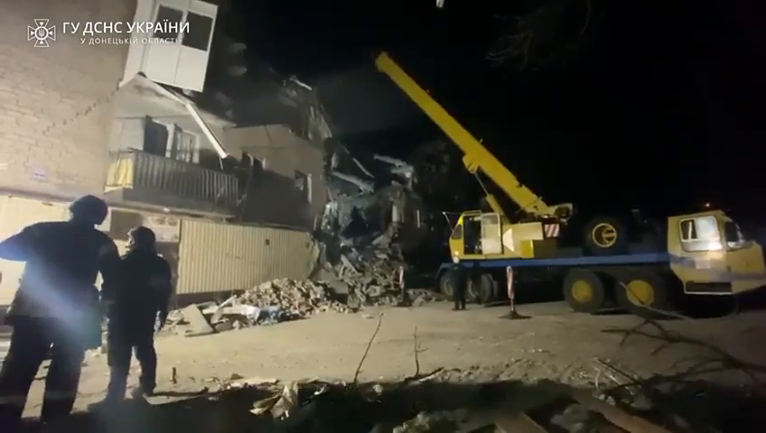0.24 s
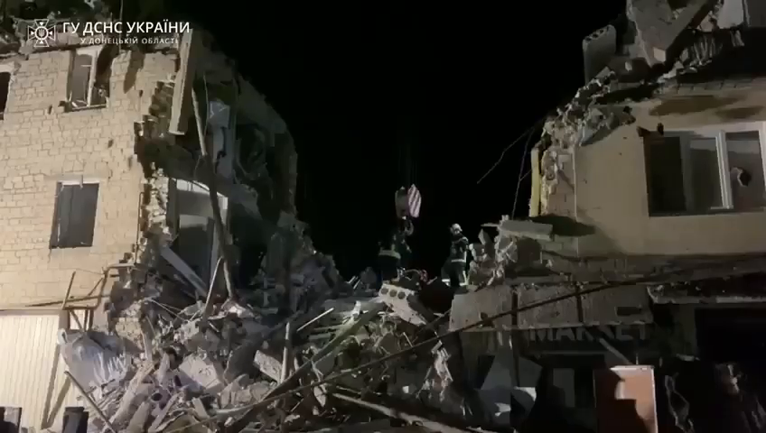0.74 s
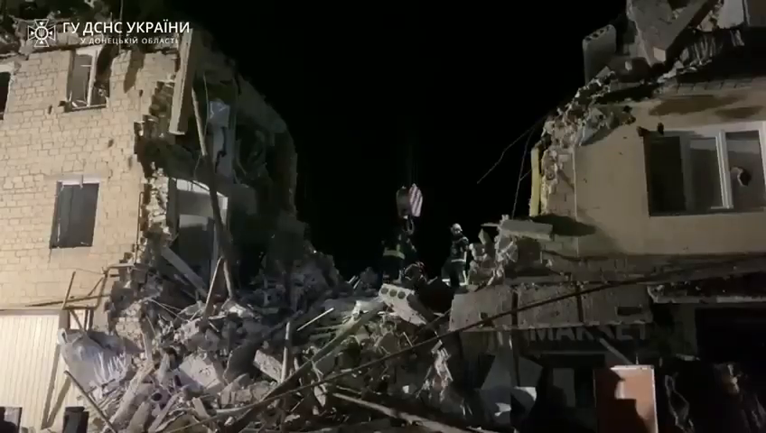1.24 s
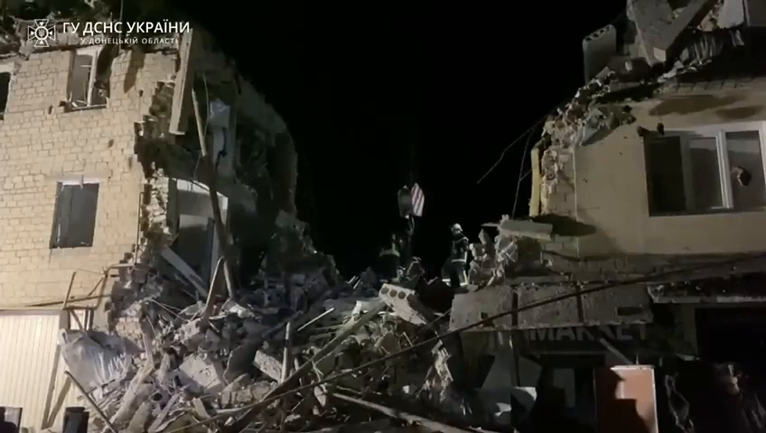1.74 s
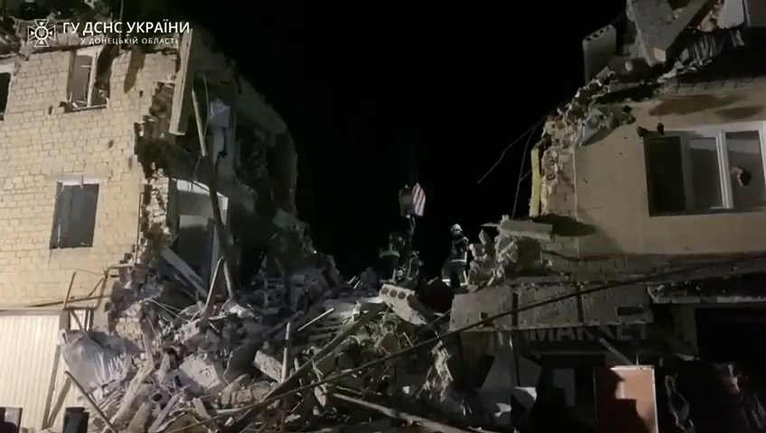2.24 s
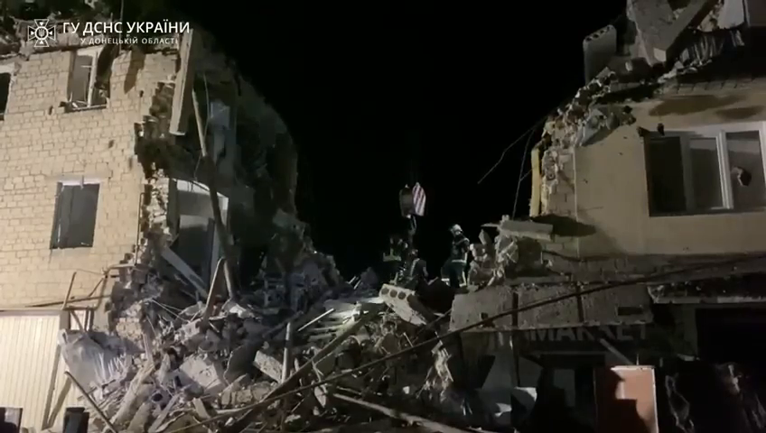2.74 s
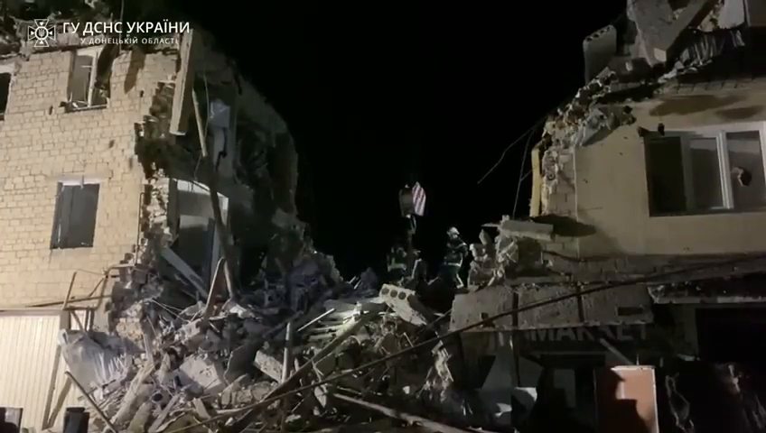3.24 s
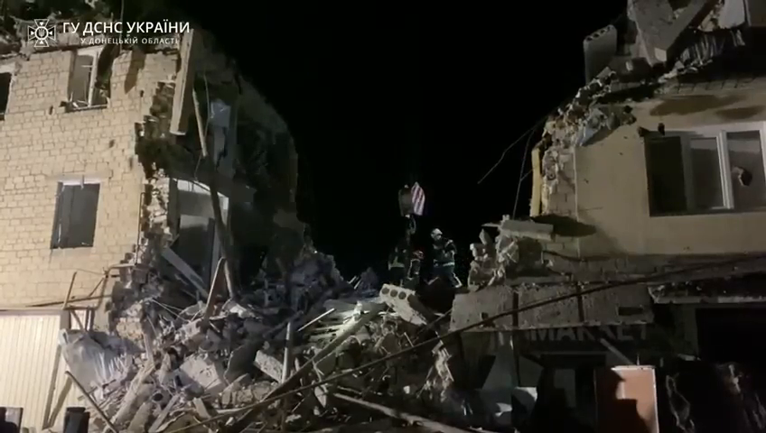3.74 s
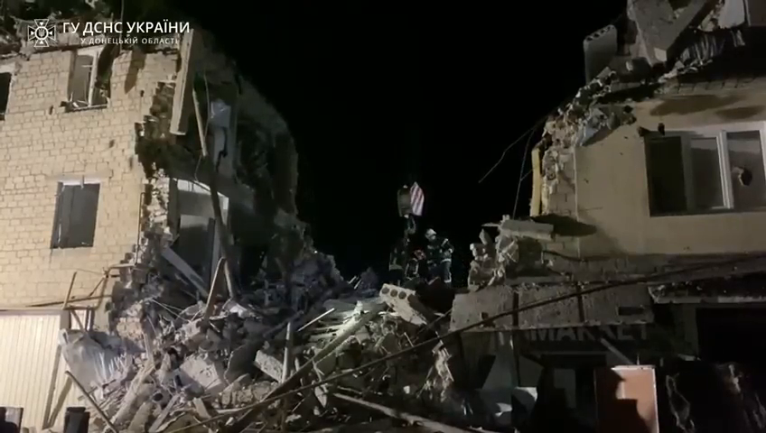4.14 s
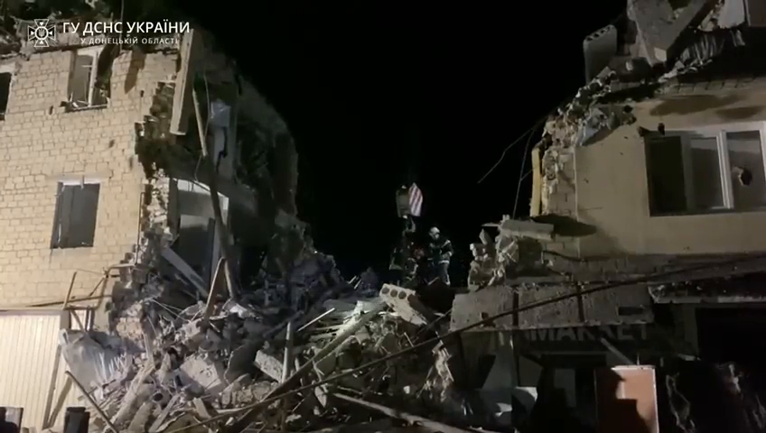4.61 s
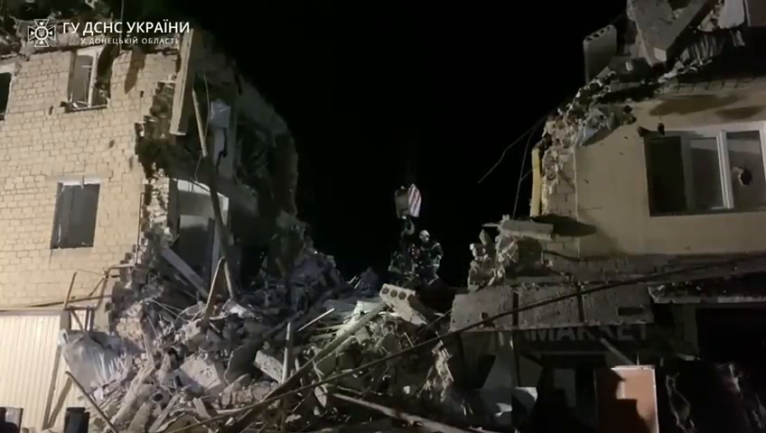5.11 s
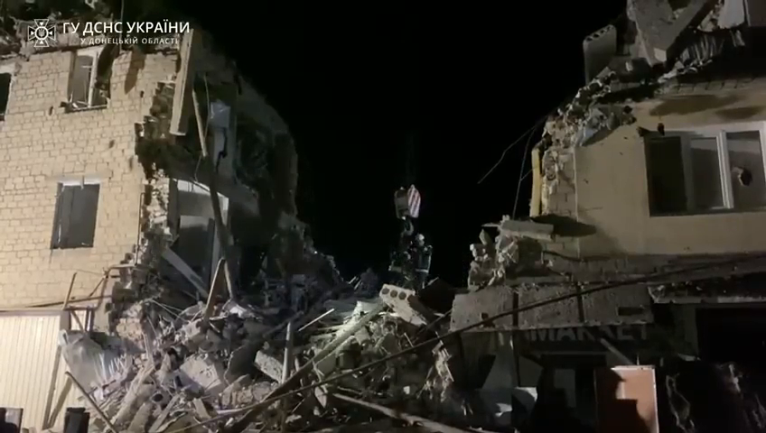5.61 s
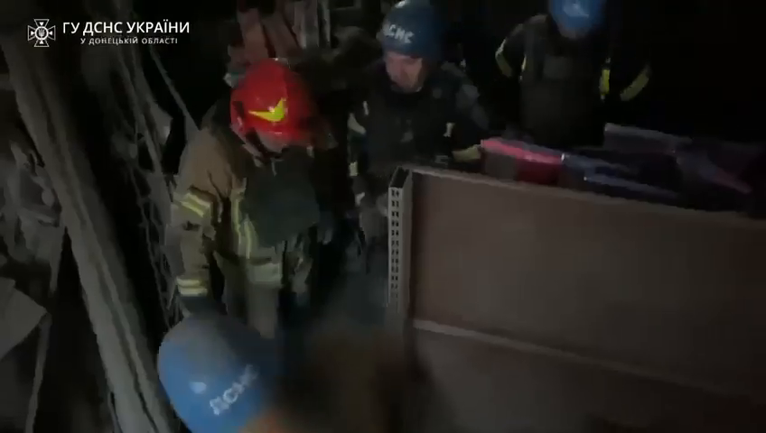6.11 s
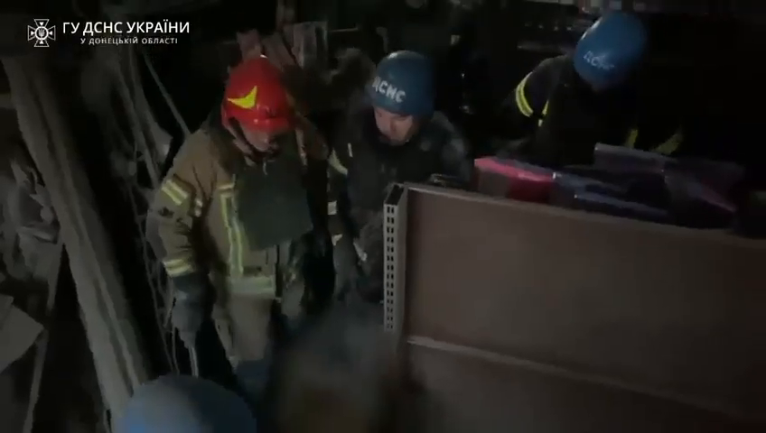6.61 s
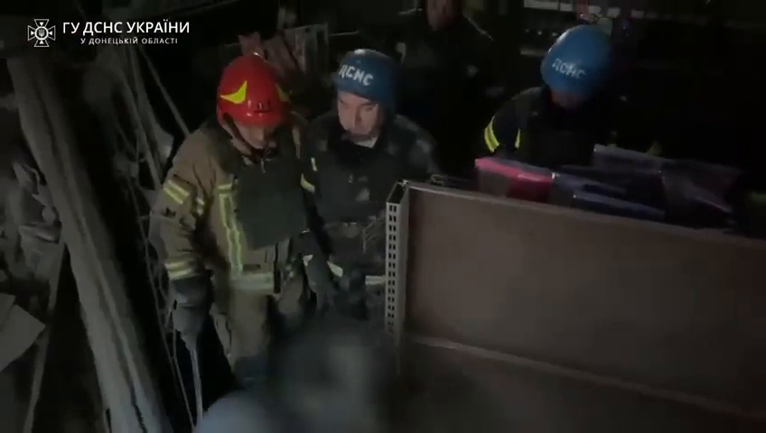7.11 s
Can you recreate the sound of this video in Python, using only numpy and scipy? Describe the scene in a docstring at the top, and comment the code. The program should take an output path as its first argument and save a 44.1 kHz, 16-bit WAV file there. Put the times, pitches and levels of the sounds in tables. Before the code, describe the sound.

Heavy engines idle with a low rumble and hum, then cut off abruptly, leaving the faint crunch and clatter of shifting rubble.

```python
"""Night rescue site from three spots

A phone with two microphone ports listens, with quick cuts between the spots. First, beside a crane truck:
firing drone, gear whine and roar. Then further off, where a four-cylinder diesel idles, its exhaust pulsing
and each firing knocking the block, next to a droning second machine and a humming pump. Last, among the
rubble, away from the engines, where boots and hands shift debris that crunches, rustles and knocks."""
import sys
import numpy as np
from scipy import signal
from scipy.fft import rfft, irfft, next_fast_len
from scipy.io import wavfile
from scipy.ndimage import uniform_filter1d

SR = 44100
rng = np.random.default_rng(int(sys.argv[2]) if len(sys.argv) > 2 else 0)


def log_audio(samples):
    """Write samples as a 16-bit WAV file to the path given in sys.argv[1]."""
    # one column per channel
    frames = np.atleast_2d(samples).T
    # limit to full scale, then quantise
    limited = np.clip(frames, -1, 1)
    pcm = np.round(limited * 32767).astype(np.int16)
    wavfile.write(sys.argv[1], SR, pcm)


N = 324267

# Beside the crane truck: its engine note. Each row: multiple of the firing rate, rms level in dB.
CRANE_HARMONICS = [(1, -51), (2, -26.5), (3, -29), (4, -35), (6, -45), (10, -48.5)]
# Rough gear whine and panel rattle. Each row: centre in Hz, width in Hz, level in dB.
CRANE_WHINE = [(770, 60, -55), (983, 40, -50), (1183, 22, -45), (1312, 30, -54), (1466, 30, -52),
               (1990, 40, -53), (2090, 30, -54), (2142, 30, -54), (2250, 30, -60), (2480, 30, -58),
               (2614, 28, -55), (2780, 28, -58), (3080, 120, -53), (3360, 250, -54.5), (3751, 40, -56),
               (4340, 100, -59), (6190, 270, -61), (5590, 770, -56)]
# The crane's roar. Each row: frequency in Hz, relative density in dB.
CRANE_ROAR = [(15, -36), (25, -12), (81, -2.5), (162, -15.5), (270, -10), (396, -18.5), (1070, -21.5),
              (1190, -17), (1700, -25.5), (2310, -35), (2700, -30), (4110, -33), (5810, -33),
              (6800, -48), (8000, -30), (10200, -45), (11300, -47), (14700, -89), (22000, -120)]
CRANE_FIRING_HZ, CRANE_ROAR_DB = 28.14, -30.5
# The two ports at each spot. Each row: frequency in Hz, likeness from -1 to 1, left minus right in dB.
CRANE_PORTS = [(200, 1, 0), (500, 0.17, 4.5), (1210, -0.48, 6), (2300, 0.24, -0.5), (5970, -0.065, 14),
               (10000, 0.38, 0)]
SITE_PORTS = [(60, .97, .3), (130, .85, .7), (300, .65, 2), (620, .55, 4.8), (1200, .7, 3.6), (2200, .7, 1),
              (4000, .45, 4.3), (6500, .5, 3.3), (10000, .78, 0)]
RUBBLE_PORTS = [(130, 1, -0.5), (268, 1, 0.5), (570, 0.48, -1), (1215, 0.37, 0), (2490, 0.17, 0),
                (5400, 0.2, 1.5), (10700, 0.83, -0.5)]

# Further off: the diesel's low exhaust pulse, plus faint wavering machinery tones from about 200 to
# 540 Hz, placed on multiples of the cycle rate. Each row: multiple of the cycle rate, rms level in dB.
CYCLE_TONES = [(10, -52), (12, -45), (13, -47), (14, -42.5), (15, -42.5), (16, -31), (17, -43), (19, -54),
               (20, -40), (21, -48), (24, -45), (25, -57), (28, -48.5), (32, -59), (40, -54), (47, -51),
               (48, -52), (49, -55), (60, -60), (62, -58), (66, -53), (67, -55), (72, -55), (78, -60),
               (92, -53), (104, -59)]
CYCLE_HZ, CYCLE_START = 5.136, .655  # four-stroke cycle rate; phase of the loudest knock in cycles
PIPE_LAG = .93  # cycles from the loudest knock to an exhaust pulse
# Engine block modes. Each row: centre in Hz, width in Hz, relative rattle in dB, lag in seconds,
# then the relative knock in dB from each of the four cylinders.
BLOCK_MODES = [(464, 320, -7, 0.00598, -4.5, -7, -14, -12), (868, 220, -5.5, .012, -17, -9.5, -10, -18),
               (1190, 42, -14, 0.0082, -19, -19, -22, -22), (1257, 48, -9.5, 0, -11, -23, -14, -22),
               (1302, 40, -4, 0, -24, -22, -20, -24), (1285, 134, -2, -.001, -0.5, -13, -5.5, -11.5),
               (1347, 40, -9.5, 0, -22, -24, -16, -22), (1695, 175, -5.5, 0.002, -19, -30, -20, -21.5),
               (2073, 266, -8, 0.0019, -8.5, -15, -20, -14),
               (2363, 260, -15.5, .004, -18, -18.5, -22, -18.5),
               (2780, 1200, -14, 0.006, -20, -20, -25, -15)]
# One firing: pilot injection, main burn, two wall echoes. Each row: delay in seconds, gain in dB.
FIRING_TRAIN = [(-.012, -8), (0, 0), (.0095, -9), (.019, -11)]
CYLINDER_LAG_S, FIRING_JITTER_S, FIRING_SCATTER_DB = [-.002, -.005, -.004, -.005], .0006, 1.2
BLOW_DB, BLOW_WIDTH_HZ = -12, 170  # the soft pressure rise drives each mode near its own pitch
BURST_DB, BURST_DECAY_S, RATTLE_DB = -43, .007, -48.5  # noise after each blow; constant rattle
# The second machine. Each row: time in seconds, pitch in Hz, rms level in dB.
MACHINE_GLIDE = [(.4, 60.2, -30), (2.3, 60, -30.5), (2.6, 60, -33.5), (2.95, 61, -34.5), (3.45, 67, -36),
                 (4, 68, -36), (5.95, 68.5, -37.5)]
# The pump's work. Each row: time in seconds, load from 0 to 1.
PUMP_LOAD = [(.4, 0), (.6, 0.06), (.75, 0.83), (1.15, 0.93), (1.75, 0.34), (2.35, 0.83), (2.95, 0.24),
             (3.6, 0.49), (4.25, 1), (5, 0.45), (5.95, 0.39)]
PUMP_HZ, PUMP_DB, PUMP_SAG_HZ, PUMP_RISE_DB = 284, -41.5, 2.6, 7  # unloaded; change at full load
THROB_DEPTH, THROB_LAG = .31, .39  # share of the amplitude; cycles after the loudest knock
# Fans and echoes off the walls. Each row: frequency in Hz, relative density in dB.
SITE_ROAR = [(15, -30), (30, -15.5), (50, -12.5), (75, -12.5), (120, -17.5), (190, -19), (290, -14.5),
             (500, -20), (700, -25), (1100, -24.5), (1520, -42), (1850, -36.5), (2500, -36), (4000, -43.5),
             (6500, -46), (7500, -52), (9500, -48), (10800, -56)]
SITE_ROAR_DB, RIGHT_LAG_S = -34.5, .00057  # the engines stand to the left of the phone
# One tick: start in seconds, decay in seconds, gain in dB.
TICK = (2.598, .003, -39.5)
# One hiss from an air valve: start in seconds, length in seconds, gain in dB.
AIR_VALVE = (4.328, .06, -49.5)
# The valve's resonances. Each row: centre in Hz, width in Hz, gain in dB.
VALVE_BANDS = [(5000, 300, -13), (6500, 300, -10), (7500, 200, -5), (8880, 250, 9), (10600, 400, -4)]

# Among the rubble: movements of boots and hands. Each row: start in seconds, length in seconds,
# crunch of coarse pieces in dB, rustle of grit and cloth in dB.
SHIFTS = [(5.94, 0.32, -47.5, -46.5), (5.981, 0.026, -41.5, -38.5), (6.203, 0.17, -38.5, -41),
          (6.412, 0.17, -45, -53), (6.715, 0.049, -41.5, -48), (6.793, 0.13, -44, -47.5),
          (6.965, 0.22, -43, -45.5), (7.054, 0.046, -55, -43.5), (7.137, 0.013, -36, -30),
          (7.278, 0.078, -66, -48)]
SHIFT_ATTACK_S, SHIFT_RELEASE_S = .013, .041
STILL_CRUNCH_DB, STILL_RUSTLE_DB = -49.5, -53  # between movements
# Coarse pieces, then grit and cloth. Each row: frequency in Hz, relative density in dB.
CRUNCH_SPECTRUM = [(15, -60), (25, -13), (102, -5), (134, -2), (168, -6), (417, -6.5), (450, -8.5),
                   (2500, -22.5), (3250, -27), (5500, -120)]
RUSTLE_SPECTRUM = [(500, -27), (900, -5), (1900, -8.5), (2500, -14), (5000, -11.5), (7200, -12.5),
                   (9300, -12), (11000, -15.5)]
# Single pieces knocking. Each row: start in seconds, peak in dB, focus of the blow in Hz,
# its spread in octaves, factor on the ring time.
KNOCKS = [(6.002, -34, 1600, 0.24, 2), (6.069, -30.5, 300, 0.69, 0.67), (6.2135, -28, 1250, 0.2, 0.57),
          (6.219, -27, 330, 0.24, 0.57), (6.232, -37, 1250, 0.23, .8), (6.238, -40, 250, 0.44, 0.77),
          (6.259, -33, 890, .3, 0.62), (6.279, -28, 330, 0.5, 1.1), (6.288, -27, 260, 0.22, 1.2),
          (6.307, -33, 306, 0.76, 2), (6.356, -31, 484, 0.44, 1.7), (6.377, -31, 260, .5, .7),
          (6.438, -35, 866, 0.28, .6), (6.436, -31, 220, 0.68, 0.94), (6.474, -32.5, 420, 0.18, 1.2),
          (6.505, -34, 300, 0.49, 0.64), (6.521, -42, 220, .4, .7), (6.536, -36, 220, 0.37, 0.76),
          (6.727, -34.5, 457, 0.23, 2), (6.746, -33, 330, 0.28, 0.59), (6.8, -35, 330, .5, .7),
          (6.815, -30.5, 400, 0.42, 0.76), (6.847, -37, 1150, 0.34, 1.4), (6.863, -30, 281, 0.51, 0.95),
          (6.881, -28.5, 280, 0.32, 1.1), (6.913, -43, 400, 0.48, 0.46), (6.993, -32.5, 145, 0.21, 4.6),
          (7.04, -28, 203, 0.56, 0.82), (7.07, -35, 1100, 0.25, 1.9), (7.071, -39.5, 2600, 0.16, 1.2),
          (7.14, -15.5, 1010, 0.7, 1.24), (7.147, -31, 262, 0.36, 1.7), (7.167, -31, 500, 0.58, 1.9)]
# How a piece rings. Each row: frequency in Hz, relative level in dB, seconds to fall by 60 dB.
DEBRIS_MODES = [(61, -12, .1), (145.3, 5, 0.075), (203, 1, 0.072), (267, 11, 0.028), (347, 2, 0.051),
                (437, 5, 0.045), (521, 7, 0.04), (740, 2.5, 0.049), (1040, 4, 0.035), (1283, 2.5, 0.043),
                (1600, -4, 0.066), (2290, -1, 0.095), (2730, 0, 0.075), (3800, -15, .04)]
KNOCK_WINDOW_S, GRIT_DECAY_S, GRIT_DB = .4, .028, -11.5  # grit gain is relative to the knock's peak

CUT_S, BLEND_S = (.385, 5.936), (.03, .008)  # when the listening spot changes; overlap of the two spots
GAP_HZ, GAP_DB, TOP_HZ = (7700, 9025), -21.5, 11000


def undb(db):
    """Decibels to amplitude."""
    return 10 ** (np.asarray(db) / 20)


def level(x, db):
    """Scale to an rms level."""
    return x * undb(db) / np.sqrt(np.mean(x ** 2))


def walk(n, rate):
    """Random levels held 1 / rate seconds and smoothed twice; spread near 1."""
    hold = int(SR / rate)
    steps = np.repeat(rng.standard_normal(n // hold + 1), hold)
    return 1.3 * uniform_filter1d(uniform_filter1d(steps, hold), hold)[:n]


def ring(x, hz, width_hz):
    """Two-pole resonance, gain 1 at the centre."""
    return signal.lfilter(*signal.iirpeak(hz, hz / width_hz, fs=SR), x)


def body(x, modes):
    """Steep resonances, scaled so that width does not change the level of noise."""
    return sum(undb(db) * np.sqrt(SR / w) * ring(ring(x, hz, w), hz, w) for hz, w, db in modes)


def tone(hz, db):
    """A sine with a moving pitch and rms level, at a random phase."""
    return np.sqrt(2) * undb(db) * np.sin(2 * np.pi * (np.cumsum(hz) / SR + rng.random()))


def noise(n, spectrum, flicker_db, rate, grain_db=0.):
    """Shared, left and right noise: half-octave bands swell together and flicker alone; grain adds grit."""
    size = next_fast_len(n)
    octave = np.log2(np.arange(1, size // 2 + 2) * SR / size)
    hz, db = np.transpose(spectrum)
    grains = undb(grain_db * np.repeat(rng.exponential(size=size // 40 + 1), 40)[:size])
    coloured = rfft(grains * rng.standard_normal((3, size))) * undb(np.interp(octave, np.log2(hz), db))
    out, swell_db = 0, .5 * walk(n, 6)
    for centre in np.arange(4, 14, .5):
        band = np.cos(np.pi * np.clip(octave - centre, -.5, .5)) ** 2
        out = out + irfft(coloured * band, size)[:, :n] * undb(swell_db + flicker_db * walk(n, rate))
    return level(out, 0)


def ports(shared, table, lag_s=0., own=None):
    """The phone's two ports: a shared sound, lag_s later on the right, plus what each hears alone."""
    n = len(shared)
    f = np.arange(1, n // 2 + 2) * SR / n
    hz, likeness, pan_db = np.transpose(table)
    likeness = np.interp(np.log(f), np.log(hz), likeness)
    pan_db = np.interp(np.log(f), np.log(hz), pan_db)
    # the bass arrives at both at once; past one full cycle of lag the treble stays in step
    lag_cycles = np.minimum(f * lag_s * f ** 2 / (f ** 2 + 350 ** 2), 1)
    pair = rfft(shared) * np.array([np.ones_like(f), np.exp(-2j * np.pi * lag_cycles)])
    if own is not None:
        pair[1] *= np.sign(likeness)
        pair = np.sqrt(abs(likeness)) * pair + np.sqrt(1 - abs(likeness)) * rfft(own)
    return irfft(pair * undb(np.array([pan_db, -pan_db]) / 2), n)


def beside_crane(n):
    """Close to the crane truck: firing harmonics under a fluttering roar and gear whine."""
    firing_hz = np.full(n, CRANE_FIRING_HZ)
    drone = sum(tone(k * firing_hz, db + 1.3 * walk(n, 10.6)) for k, db in CRANE_HARMONICS)
    roar = undb(CRANE_ROAR_DB) * noise(n, CRANE_ROAR, flicker_db=2, rate=25.7)
    whine = body(rng.standard_normal((3, n)), CRANE_WHINE)
    wide = (roar + whine) * undb(1.5 * walk(n, 60))
    return drone + ports(wide[0], CRANE_PORTS, own=wide[1:])


def exhaust_and_machinery(t):
    """The diesel's low exhaust pulse and faint higher machinery tones, on multiples of the cycle rate."""
    cycle_hz = CYCLE_HZ * (1 + .001 * walk(len(t), 2))
    phase = 2 * np.pi * (np.cumsum(cycle_hz) / SR + t[0] * CYCLE_HZ - CYCLE_START - PIPE_LAG)
    out = 0
    for k, db in CYCLE_TONES:
        # the pipe favours the 16th multiple; the others waver more and lie a quarter turn behind it
        wave, waver_db = (np.cos, .4) if k == 16 else (np.sin, 1.5)
        out = out + np.sqrt(2) * undb(db + waver_db * walk(len(t), 3)) * wave(k * phase)
    return out


def diesel_firings(t):
    """Each firing strikes the rattling block and shakes it briefly; exhaust gas hisses in time."""
    n = len(t)
    firing = 4 * (t * CYCLE_HZ - CYCLE_START)
    index = np.arange(int(firing[0]) + 1, int(firing[-1]) - 1)
    cylinder = index % 4
    jitter, scatter = rng.standard_normal((len(index), 2)).T
    fired_s = (index / 4 + CYCLE_START) / CYCLE_HZ - t[0]
    fired_s += np.array(CYLINDER_LAG_S)[cylinder] + FIRING_JITTER_S * jitter
    hiss, clatter = rng.standard_normal((2, 3, n))
    clatter *= undb(RATTLE_DB + 2.7 * walk(n, 70))
    fade = np.exp(-1 / (BURST_DECAY_S * SR))
    block = 0
    for hz, width_hz, rattle_db, lag_s, *knock_db in BLOCK_MODES:
        strength = undb(np.array(knock_db)[cylinder] + FIRING_SCATTER_DB * scatter)
        blows = np.zeros(n)
        blows[((fired_s + lag_s) * SR).astype(int)] = strength
        train = sum(undb(db) * np.roll(blows, int(delay_s * SR)) for delay_s, db in FIRING_TRAIN)
        push = undb(BLOW_DB) * ring(ring(train, hz, BLOW_WIDTH_HZ), hz, BLOW_WIDTH_HZ)
        burst = undb(BURST_DB) * signal.lfilter([0, 1 - fade], [1, -2 * fade, fade ** 2], train)
        block = block + body(push + burst * hiss + undb(rattle_db) * clatter, [(hz, width_hz, 0)])
    gas = ring(rng.standard_normal((3, n)), hz=3840, width_hz=3300)
    puffs = (1 + np.cos(2 * np.pi * (firing - .2))) * gas
    return block + level(puffs, db=-58)


def second_machine(t):
    """A wavering drone glides from a slow to a fast speed and grows quieter."""
    times, hz, db = np.transpose(MACHINE_GLIDE)
    waver_db = 2.2 * walk(len(t), 4.05)
    return tone(np.interp(t, times, hz), np.interp(t, times, db) + waver_db)


def pump(t):
    """Load lowers the pitch and raises the level; every engine cycle swells the hum once."""
    load = np.interp(t, *np.transpose(PUMP_LOAD))
    throb = 1 + THROB_DEPTH * np.cos(2 * np.pi * (t * CYCLE_HZ - CYCLE_START - THROB_LAG))
    return throb * tone(PUMP_HZ - PUMP_SAG_HZ * load, PUMP_DB + PUMP_RISE_DB * load + walk(len(t), 12))


def tick(t):
    """One small bright tick of fast-dying noise."""
    start, decay, db = TICK
    envelope = undb(db) * (t > start) * np.exp(-np.clip(t - start, 0, None) / decay)
    return envelope * ring(rng.standard_normal((3, len(t))), hz=7300, width_hz=9200)


def air_valve(t):
    """A short puff of air hisses through narrow treble resonances."""
    start, length, db = AIR_VALVE
    age = np.clip(t - start, 0, None) / length
    envelope = undb(db) * np.tanh(8 * age) * np.exp(-age ** 2)
    return body(envelope * rng.standard_normal((3, len(t))), VALVE_BANDS)


def further_off(t):
    """At a distance, engines to the left: their tones and noises, with the roar off the walls."""
    cycle_tones, firings = exhaust_and_machinery(t), diesel_firings(t)
    tones = cycle_tones + second_machine(t) + pump(t)
    wide = firings + air_valve(t) + tick(t)
    wide += undb(SITE_ROAR_DB) * noise(len(t), SITE_ROAR, flicker_db=2, rate=10)
    return ports(tones, SITE_PORTS, RIGHT_LAG_S) + ports(wide[0], SITE_PORTS, RIGHT_LAG_S, own=wide[1:])


def shifting_debris(t):
    """Boots and hands raise a crunch and a rustle; each move rises, holds and dies away; powers add."""
    start, length, crunch_db, rustle_db = np.transpose(SHIFTS)[:, :, None]
    attack = np.clip((t - start) / SHIFT_ATTACK_S, 0, 1)
    release = np.exp(-np.clip(t - start - length, 0, None) / SHIFT_RELEASE_S)

    def envelope(db, still_db):
        return np.sqrt(((undb(db) * attack * release) ** 2).sum(axis=0) + undb(still_db) ** 2)

    crunch = noise(len(t), CRUNCH_SPECTRUM, flicker_db=1.5, rate=23, grain_db=1.6)
    rustle = noise(len(t), RUSTLE_SPECTRUM, flicker_db=2.05, rate=14.64, grain_db=1.5)
    return envelope(crunch_db, STILL_CRUNCH_DB) * crunch + envelope(rustle_db, STILL_RUSTLE_DB) * rustle


def knocking_pieces(t):
    """Struck pieces ring briefly, each tuned a little differently, and throw up grit."""
    hz, db, t60 = np.transpose(DEBRIS_MODES)[:, :, None]
    rings, grit_power = np.zeros((2, len(t)))
    for start, peak_db, focus_hz, octaves, ring_scale in KNOCKS:
        active = (t > start) & (t < start + KNOCK_WINDOW_S)
        age = t[active] - start
        tune = 1 + .021 * rng.standard_normal(hz.shape)
        gains = undb(db) * np.exp(-.5 * (np.log2(hz / focus_hz) / octaves) ** 2)
        modes = gains * undb(-60 * age / (ring_scale * t60)) * np.sin(2 * np.pi * hz * tune * age)
        contact = 1 - np.exp(-age * focus_hz / 1.4)  # the contact lasts a cycle or two
        knock = modes.sum(axis=0) * contact
        rings[active] += undb(peak_db) * knock / abs(knock).max()
        grit_power[active] += (undb(peak_db + GRIT_DB) * contact * np.exp(-age / GRIT_DECAY_S)) ** 2
    grit = np.sqrt(grit_power) * ring(rng.standard_normal((3, len(t))), hz=1200, width_hz=4900)
    return rings, grit


def among_rubble(t):
    """Away from the engines: knocks in the centre, crunch and grit spread across both ports."""
    shifting = shifting_debris(t)
    rings, grit = knocking_pieces(t)
    wide = shifting + grit
    return rings + ports(wide[0], RUBBLE_PORTS, own=wide[1:])


def scene():
    """The three spots, one after the other, each blending briefly into the next."""
    t = np.arange(N) / SR
    cuts = list(zip(CUT_S, BLEND_S))
    site_start, rubble_start = (int(s * SR) for s, blend in cuts)
    crane_end, site_end = (int((s + blend) * SR) for s, blend in cuts)
    first_fade, second_fade = (np.pi / 2 * np.clip((t - s) / blend, 0, 1) for s, blend in cuts)
    site = slice(site_start, site_end)
    out = np.zeros((2, N))
    out[:, :crane_end] += np.cos(first_fade[:crane_end]) * beside_crane(crane_end)
    out[:, site] += np.sin(first_fade[site]) * np.cos(second_fade[site]) * further_off(t[site])
    out[:, rubble_start:] += np.sin(second_fade[rubble_start:]) * among_rubble(t[rubble_start:])
    return out


def record(dry):
    """The treble has a steady gap near 8 kHz and ends in a steep cut."""
    gap_band = signal.sosfiltfilt(signal.butter(4, GAP_HZ, "bandpass", fs=SR, output="sos"), dry)
    top_cut = signal.ellip(10, .2, 80, TOP_HZ, fs=SR, output="sos")
    return signal.sosfilt(top_cut, dry - (1 - undb(GAP_DB)) * gap_band)


dry = scene()
out = record(dry)
log_audio(out)
```